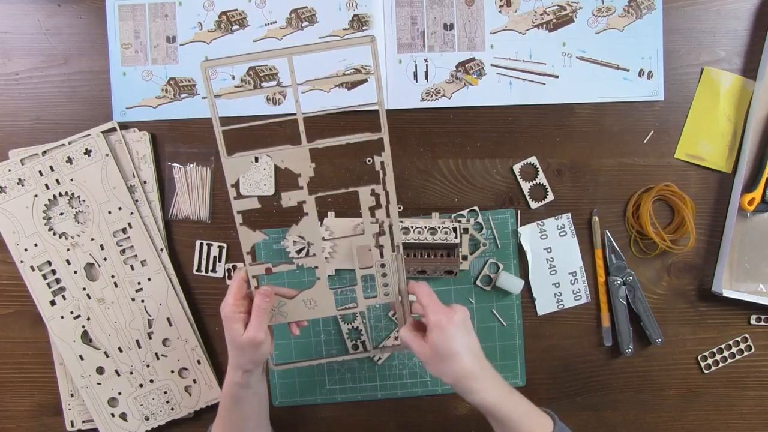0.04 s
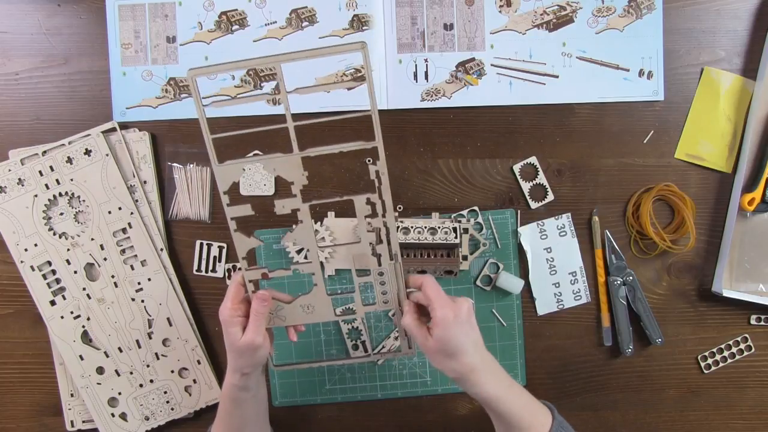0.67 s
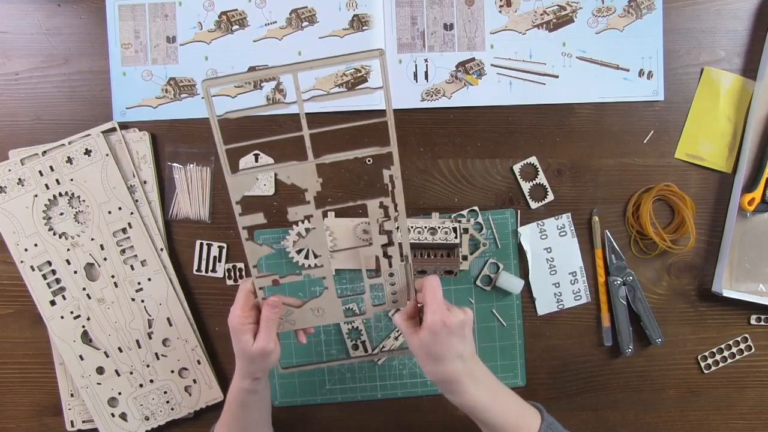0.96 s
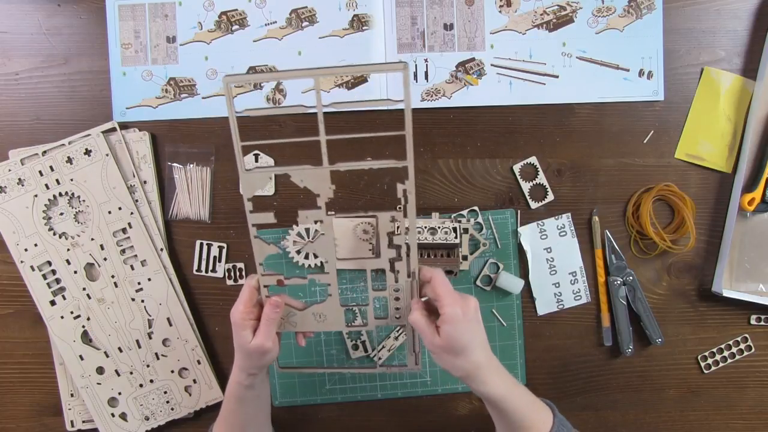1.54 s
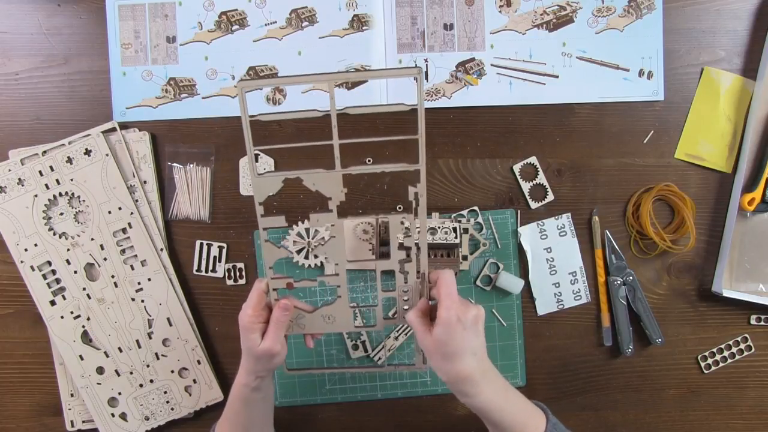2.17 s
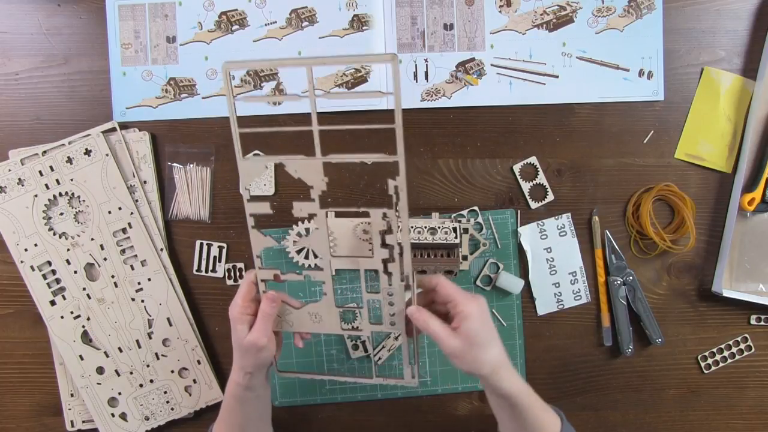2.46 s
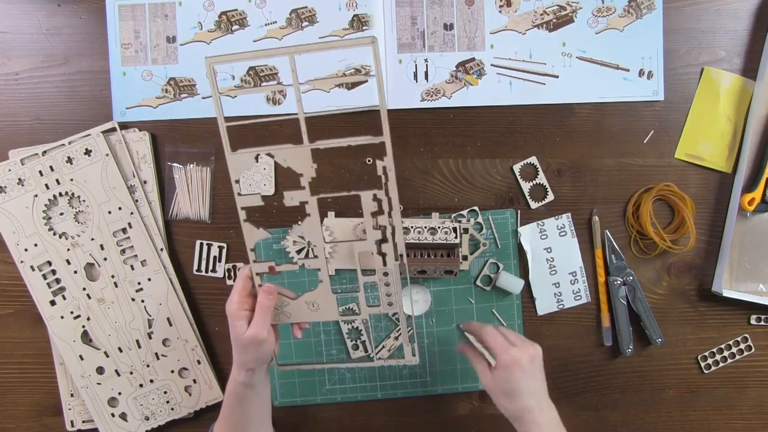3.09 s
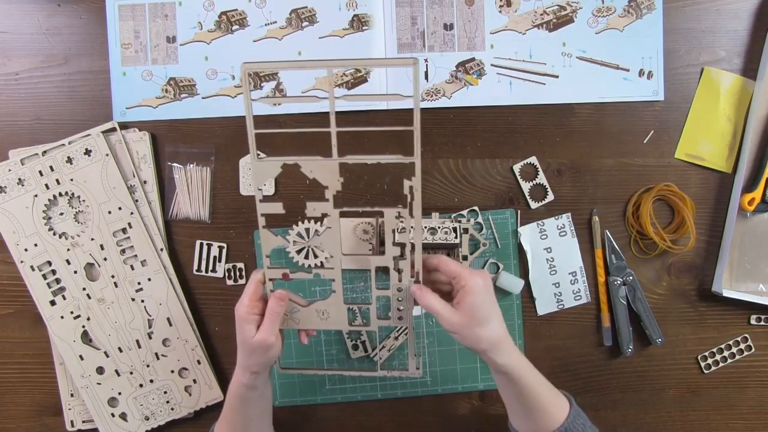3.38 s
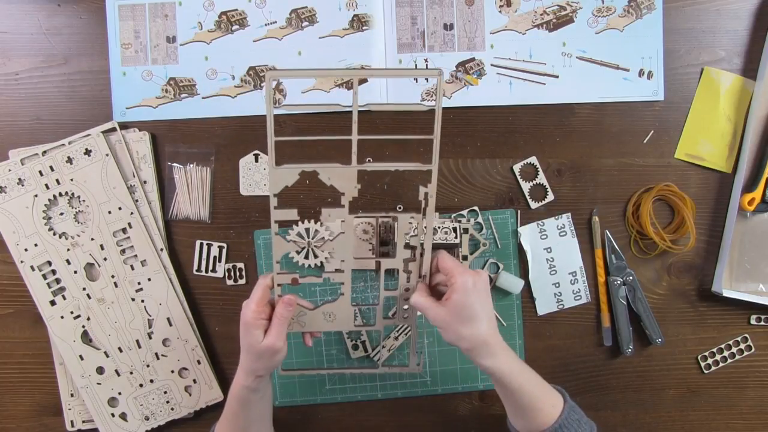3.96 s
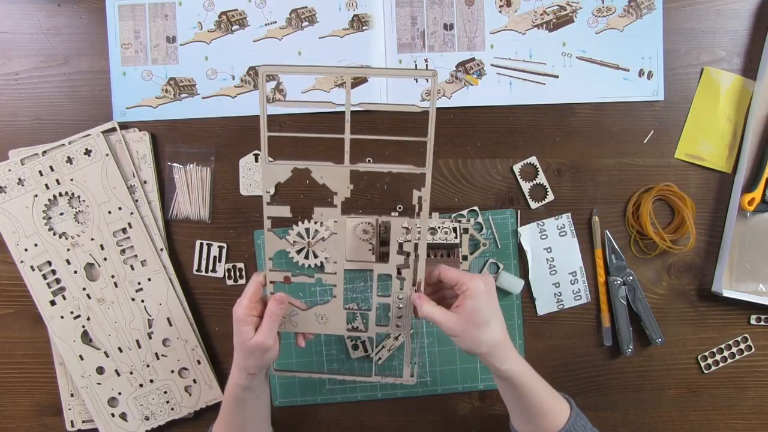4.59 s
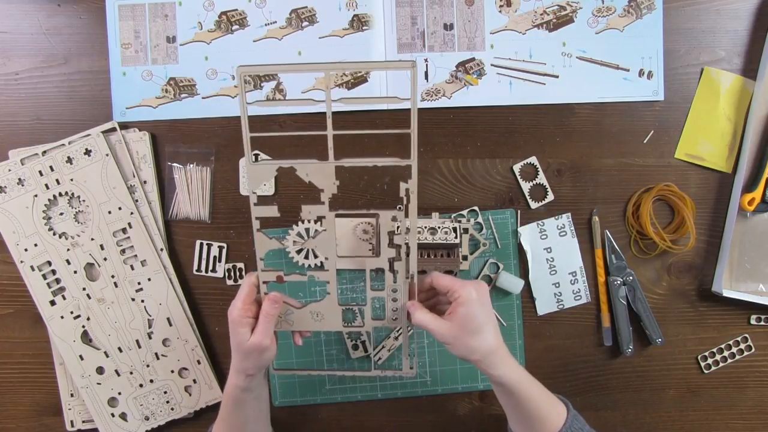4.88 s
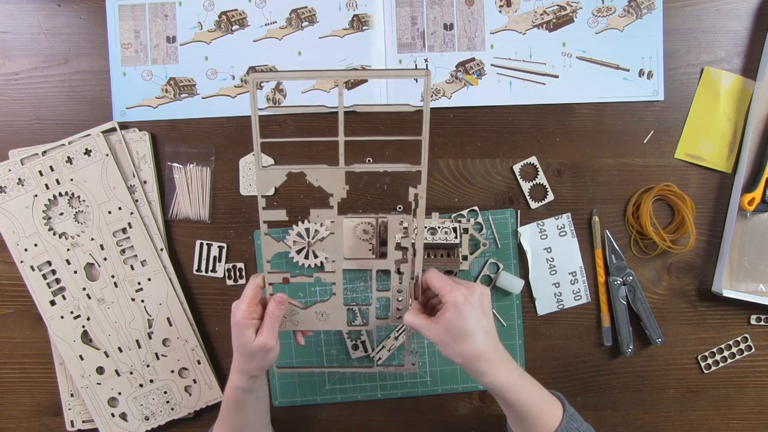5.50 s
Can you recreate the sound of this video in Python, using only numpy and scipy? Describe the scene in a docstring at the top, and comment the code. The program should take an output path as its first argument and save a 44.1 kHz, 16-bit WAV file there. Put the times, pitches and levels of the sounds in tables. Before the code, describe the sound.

Fingers press small parts out of a thin plywood sheet, making irregular sharp snaps and tiny cracks, with faint rubbing and a brief squeak between them. Three louder snaps come close together, then a freed wooden disc drops and bounces on the table with a dry, ringing clack. A few softer clicks follow. It is heard close up in a small room with a low rumble.

```python
"""Pressing parts out of plywood

Small parts are pushed by hand out of a thin laser-cut sheet, close up in a small room with a low rumble.
Fingers slide and squeak on the wood. Fibres crack as a tab bends, the tab snaps and its broken end
catches once more, each break ringing the sheet. A freed wooden disc drops and bounces on the table."""
import sys
import numpy as np
from scipy import signal
from scipy.fft import rfft, irfft
from scipy.io import wavfile

SR = 44100
rng = np.random.default_rng(int(sys.argv[2]) if len(sys.argv) > 2 else 0)


def store_wav(level_fs):
    """Save 16-bit WAV to argv[1]."""
    pcm = np.round(np.clip(np.atleast_2d(level_fs), -1, 1) * 32767)
    wavfile.write(sys.argv[1], SR, pcm.T.astype(np.int16))


N = 248546
TIME = np.arange(N) / SR
CUTOFF_HZ = 16000

# The colour of the room tone. Each row: frequency in Hz, relative level in dB.
ROOM_TONE = [(15, -56), (25, -10), (36, -16.5), (64, 1.5), (157, -4), (194, -5.5), (352, -11), (486, -12.5),
             (527, -13.5), (729, -16), (857, -17), (1060, -20), (2150, -23.5), (2970, -25.5), (15800, -34)]
# The room's answer. Each row: frequency in Hz, early reflections in dB, tail in dB, tail t60 in seconds.
ROOM_REVERB = [(125, -33, -19, 1), (496, -9.5, -18, 0.26), (1480, -10.5, -18, 0.41),
               (3950, -20.5, -20, 0.79), (8000, -21, -24.5, 0.3), (14000, -14, -20, 0.54)]
# Fingers and loose parts sliding on the sheet. Each row: midpoint in seconds, length in seconds,
# level in dB, tilt in dB per octave, pitch of the touched strip in Hz.
STROKES = [(0.078, 0.11, -59.5, -2.5, 11600), (0.362, .11, -58.5, -0.5, 8700),
           (0.508, .19, -54.5, 1.2, 7600), (0.671, 0.15, -59, 0.5, 14800), (1.154, 0.12, -56.5, -4.5, 5570),
           (1.237, 0.049, -50.5, 0.5, 14400), (1.291, .1, -59, -0.5, 6000), (1.395, 0.15, -54, 3, 5280),
           (1.544, 0.3, -59.5, 0.5, 14800), (1.851, 0.099, -65, 11, 10100), (2.0, 0.056, -57.5, 2, 11800),
           (2.509, 0.095, -54.5, -1, 7100), (2.593, .08, -42.5, 2, 6200), (2.662, 0.084, -50, -1, 5000),
           (2.912, 0.22, -60, -2.5, 6500), (3.483, 0.11, -67, 5, 12860), (3.595, 0.032, -59.5, 0, 9300),
           (3.904, .11, -56.5, 2, 2700), (4.33, 0.31, -61.5, -1, 11900), (4.821, 0.13, -52, 1, 14800),
           (5.511, 0.21, -60.5, -0.5, 6400)]
# Stick-slip squeaks. Each row: start in seconds, length in seconds, slips per second, level in dB.
SQUEAKS = [(0.579, .003, 790, -44), (1.247, .015, 616, -37.5), (1.262, .013, 650, -41),
           (1.28, .006, 205, -35.5)]
# The body of a squeak. Each row: pitch in Hz, level in dB, t60 in seconds.
SQUEAK_MODES = [(720, -15, 0.025), (900, -1, 0.0068), (1870, -7, 0.0031)]
# A loose part knocking in its slot. Each row: start in seconds, pitch in Hz, level in dB.
SLOT_KNOCKS = [(2.2756, 926, -13), (2.3495, 646, -7.5)]
# The four registers of a hit: thump, knock, crack and edge. Each row: bottom in Hz, top in Hz.
REGISTERS = [(75, 440), (450, 1500), (1600, 6400), (7000, 16500)]
# The disc landing and bouncing. Each row: start in seconds, contact time in seconds, level in dB.
BOUNCES = [(3.0794, 0.002, -7.5), (3.0825, 0.00126, 1), (3.136, 0.00067, -20), (3.1533, 0.0019, -9),
           (3.183, .0013, -44)]
# The ring of the disc and the table under it. Each row: pitch in Hz, level in dB, t60 in seconds.
DISC_MODES = [(440.5, -9.5, 0.33), (963, -12, .12), (1256, -11.5, 0.11), (1385, -9, 0.03),
              (1674, -4.5, 0.05), (2205, -10, .06), (2500, -12, 0.086), (3110, -5.5, .05),
              (3615, -12, 0.026), (4770, -21, .055), (5500, -3.5, 0.014), (6050, -7.5, 0.015),
              (7850, -8.5, 0.011), (11100, -4, .009)]
# The ring of the held sheet. Each row: pitch in Hz, level in dB, t60 in seconds.
SHEET_MODES = [(293, -15, 0.051), (495, -21, 0.56), (654, -18, 0.05), (806, -4, 0.017), (2198, -12, 0.022),
               (2636, -12, 0.026), (3050, -16, 0.036), (3620, -12, 0.06), (5390, -24, 0.11),
               (11300, -25, .045)]
# The strip of wood being worked on. Each row: start in seconds, pitch of its ping in Hz.
STRIP_PITCHES = [(0, 12380), (0.15, 6070), (0.23, 9000), (0.8, 5630), (0.9, 2440), (0.96, 5580),
                 (1.3, 2460), (2.0, 3780), (2.2, 9800), (2.3, 12260), (3.7, 14200), (5.3, 6500)]
# Fibres cracking while the tab still holds. Each row: start in seconds, length in seconds,
# level in dB, edge in dB relative to that level.
FIBRE_CRACKS = [(0.0472, 0.0011, -27.5, 11), (0.2516, .0011, -29, 3), (0.26, 0.0015, -25, 7.5),
                (0.8714, 0.00041, -20, -3), (0.9329, 0.00091, -16.5, -12), (0.9406, 0.001, -15, -11),
                (0.9433, 0.0012, -12, -1.5), (0.9476, 0.0029, -18, -3), (0.955, 0.00069, -17.5, -5),
                (1.0268, 0.00058, -20, 4), (1.14, 0.0013, -30.5, 12), (1.169, 0.0025, -18, 5),
                (1.187, 0.0033, -25, 2), (1.341, 0.002, -27.5, 3.5), (1.35, 0.0018, -27, -6),
                (1.805, 0.0016, -31.5, 5), (2.2483, 0.0023, -28.5, 9.5), (2.273, 0.0028, -14.5, 1),
                (2.3395, 0.0085, -18.5, 6), (2.443, 0.0025, -28, 4.5), (2.5905, 0.0022, -17, -1.5),
                (3.7684, 0.0023, -20.5, 4.5), (3.8014, 0.0022, -21.5, -11), (3.8209, 0.0017, -16, -4),
                (3.937, 0.0012, -34, 6), (5.081, 0.0014, -32.5, 11), (5.537, .0017, -28, -3)]
# Tabs snapping through. Each row: start in seconds, length in seconds, level in dB,
# then thump, knock, edge and recoil in dB relative to that level.
TAB_SNAPS = [(0.1995, 0.0016, -5.5, 0.5, -6.5, -1.5, -23), (0.9651, 0.00092, -17, 4.5, -0.5, 7.5, 2.5),
             (2.071, 0.0015, -4, -2, -5, -2, -17.5), (2.2562, 0.0036, -6, -13, -13.5, 1, -10.5),
             (2.3491, 0.0015, 0.5, -16, -18, -9, -15.5), (3.8803, 0.0019, -18.5, 0, -9, 4, -25)]


def from_db(db):
    """Decibels to gain."""
    return 10 ** (np.asarray(db) / 20)


def unit_energy(x):
    """Scale so that the squares sum to one."""
    return x / np.sqrt(np.sum(x ** 2) + 1e-20)


def at_hz(points, hz, column=1):
    """Read a column of a table along log frequency."""
    points = np.array(points)
    return np.interp(np.log(hz), np.log(points[:, 0]), points[:, column])


def add(out, start, sound):
    """Mix a sound in at a start time in seconds."""
    first = max(0, round(start * SR))
    out[first:first + len(sound)] += sound[:N - first]


def bandpass(x, edges_hz, order=2):
    """Keep the band between two frequencies."""
    return signal.sosfilt(signal.butter(order, edges_hz, "band", fs=SR, output="sos"), x)


def ring(force, hz, t60):
    """One damped mode; a unit click rings with height one."""
    radius, angle = from_db(-60 / (t60 * SR)), 2 * np.pi * hz / SR
    return signal.lfilter([0, np.sin(angle)], [1, -2 * radius * np.cos(angle), radius ** 2], force + 1e-18)


def room_tone(level_db=-56):
    """The bed: a steady low rumble with a faint hiss on top."""
    hz = np.maximum(np.fft.rfftfreq(N, 1 / SR), 1)
    rumble = irfft(rfft(rng.standard_normal(N)) * from_db(at_hz(ROOM_TONE, hz)), N)
    return from_db(level_db) * unit_energy(rumble) * np.sqrt(N)


def room_reverb(x, first_s=0.0038, build_s=0.011, early_t60=0.07):
    """Quick reflections off the table and the things on it, then a soft tail."""
    t, response = TIME[:SR * 2 // 3], 0
    fade_in = np.clip(t / first_s - 1, 0, 1)
    edges_hz = np.geomspace(22, 17000, 25)
    for low, high in zip(edges_hz, edges_hz[1:]):
        hz = np.sqrt(low * high)
        early_db, tail_db, tail_t60 = (at_hz(ROOM_REVERB, hz, column) for column in (1, 2, 3))
        early, tail = bandpass(rng.standard_normal((2, len(t))), [low, high]) * fade_in
        early = unit_energy(early * from_db(-60 * t / early_t60))
        tail = unit_energy(tail * (1 - np.exp(-t / build_s)) * from_db(-60 * t / tail_t60))
        share = np.sqrt(2 * hz * np.log(high / low) / SR)   # the band's part of the whole spectrum
        response += share * (from_db(early_db) * early + from_db(tail_db) * tail)
    return signal.fftconvolve(x, response)[:N]


def strain_ticks(per_s=80, level_db=-67.5, decay_s=0.002, low_hz=1800, strain_s=0.32):
    """Stray fibres tick in the bent sheet, louder around each break, where the strain peaks."""
    clicks = (rng.random(N) < per_s / SR) * rng.uniform(0.4, 1, N)
    envelope = signal.lfilter([1], [1, -np.exp(-1 / (decay_s * SR))], clicks + 1e-18)
    low_cut = signal.butter(1, low_hz, "high", fs=SR, output="sos")
    ticks = signal.sosfilt(low_cut, envelope * rng.standard_normal(N))
    to_break = np.min([np.abs(TIME - row[0]) for row in TAB_SNAPS + FIBRE_CRACKS], axis=0)
    return from_db(level_db) * np.exp(-to_break / strain_s) * unit_energy(ticks) * np.sqrt(N)


def rubbing(grain_db=4.0, catch_db=3.5, catches_per_s=150, strips_db=-4.5, note_db=-9.5, low_hz=1300):
    """Skin drags over the grain: dense ticks that waver as it catches and set the strips singing."""
    out = np.zeros(N)
    for middle, length, level_db, tilt, note_hz in STROKES:
        t = TIME[:round(length * SR)]
        ticks = rng.standard_normal(len(t)) * from_db(grain_db * rng.standard_normal(len(t)))
        strips = sum(unit_energy(ring(ticks, hz, t60=0.011)) for hz in rng.uniform(2200, 15500, 12))
        scrape = unit_energy(ticks) + from_db(strips_db) * unit_energy(strips)
        hz = np.maximum(np.fft.rfftfreq(len(t), 1 / SR), 1)
        colour = from_db(tilt * np.log2(hz)) * hz / np.hypot(hz, low_hz) * (hz < CUTOFF_HZ)
        scrape = unit_energy(irfft(rfft(scrape) * colour, len(t)))
        # the finger damps the strip right under it to two dozen cycles
        scrape += from_db(note_db) * unit_energy(ring(ticks, note_hz, 24 / note_hz))
        catching = np.interp(t * catches_per_s, np.arange(len(t)), rng.standard_normal(len(t)))
        swell = from_db(level_db + catch_db * catching) * np.sin(np.linspace(0, np.pi, len(t)))
        add(out, middle - length / 2, swell * scrape * np.sqrt(len(t)))
    return out


def squeaks(jitter=0.2, uneven_db=2.5):
    """A fingertip or a tight part sticks and slips in short runs, driving the sheet's low modes."""
    slips = np.zeros(N)
    for start, length, per_s, level_db in SQUEAKS:
        offsets = np.cumsum(np.abs(1 + jitter * rng.standard_normal(24))) / per_s
        offsets -= offsets[0]
        for offset in offsets[offsets < length]:
            add(slips, start + offset, from_db([level_db + uneven_db * rng.standard_normal()]))
    return sum(from_db(db) * ring(slips, hz, t60) for hz, db, t60 in SQUEAK_MODES)


def fibre_burst(t, length, rise_s=0.00009, stretch=1.44, uneven_db=3.0):
    """The attack of a hit: an avalanche of tiny, uneven ruptures that dies within milliseconds."""
    envelope = (1 - np.exp(-t / rise_s)) * np.exp(-t / (stretch * length))
    return envelope * rng.standard_normal(len(t)) * from_db(uneven_db * rng.standard_normal(len(t)))


def wood_hits(hits, modes, attack_db, ring_db, scatter_db, detune, colour_share):
    """Each hit is a burst, coloured in four registers, that also sets the wood's modes ringing."""
    out, t = np.zeros(N), TIME[:SR // 4]
    centres_hz = np.sqrt(np.prod(REGISTERS, axis=1))
    for start, length, level_db, thump_db, knock_db, edge_db, *_ in hits:
        colour = [thump_db, knock_db, 0, edge_db]
        for edges_hz, register_db in zip(REGISTERS, colour):
            attack = bandpass(fibre_burst(t[:SR // 20], length) + 1e-18, edges_hz)
            add(out, start, from_db(level_db + register_db + attack_db) * unit_energy(attack))
        force = fibre_burst(t, length)
        for hz, mode_db, t60 in modes:
            # grip and contact shift the modes from hit to hit
            level_shift, pitch_shift = np.clip(rng.standard_normal(2), -2, 2)
            drive_db = level_db + colour_share * at_hz(list(zip(centres_hz, colour)), hz)
            gain = from_db(drive_db + mode_db + ring_db + scatter_db * level_shift)
            add(out, start, gain * unit_energy(ring(force, hz * (1 + detune * pitch_shift), t60)))
    return out


def slot_knocks(contact_s=0.00023, ring_cycles=26):
    """A loosened part hits the side of its slot with a short, hollow note."""
    out, t = np.zeros(N), TIME[:SR // 10]
    for start, hz, level_db in SLOT_KNOCKS:
        note = ring(fibre_burst(t, contact_s), hz, ring_cycles / hz)
        add(out, start, from_db(level_db) * unit_energy(note))
    return out


def table_clack(gain_db=-5.5, t60=0.071, band_hz=(900, 4800)):
    """Under each bounce, the table's countless close modes blur into a dry clack."""
    out, t = np.zeros(N), TIME[:SR // 4]
    for start, _, level_db in BOUNCES:
        clack = bandpass(rng.standard_normal(len(t)) * from_db(-60 * t / t60), band_hz, order=3)
        add(out, start, from_db(level_db + gain_db) * unit_energy(clack))
    return out


def disc_drop(thump_db=-21, knock_db=-14.5, edge_db=-9.5, dulling=0.8):
    """The freed disc lands, bounces and rings; the weaker the contact, the duller it sounds."""
    hits = [(start, length, db, thump_db - dulling * db, knock_db - dulling * db, edge_db)
            for start, length, db in BOUNCES]
    return wood_hits(hits, DISC_MODES, attack_db=1.0, ring_db=-2.0, scatter_db=5.0,
                     detune=0.0016, colour_share=0.57)


def strip_pings(hits, t60_at_3khz=0.011, falloff=0.3):
    """The strip that a break lets go springs back at its own pitch; higher pings die sooner."""
    out, t = np.zeros(N), TIME[:SR // 10]
    for start, length, level_db, *_, ping_db in hits:
        hz = [pitch for since, pitch in STRIP_PITCHES if since <= start][-1]
        ping = ring(fibre_burst(t, length / 2), hz, t60_at_3khz * (3000 / hz) ** falloff)
        add(out, start, from_db(level_db + ping_db) * unit_energy(ping))
    return out


def crack_hit(start, length, level_db, edge_db, ping_db=-1.0):
    """The hit for one small break: the sharper its edge, the harder it jolts the sheet."""
    thump_db = -15.0 + 1.53 * edge_db
    knock_db = -8.5 + 0.36 * edge_db
    return start, length, level_db, thump_db, knock_db, edge_db, ping_db


def breaking_tabs(snap_ping_db=-0.5, recoil_delay_s=0.008, recoil_length_s=0.0012):
    """Fibres crack, tabs snap and each broken end springs back and catches; sheet and strip ring."""
    hits = [crack_hit(*row) for row in FIBRE_CRACKS]
    for start, length, level_db, *colour, recoil_db in TAB_SNAPS:
        hits.append((start, length, level_db, *colour, snap_ping_db))
        hits.append(crack_hit(start + recoil_delay_s, recoil_length_s, level_db + recoil_db, edge_db=5.5))
    sheet = wood_hits(hits, SHEET_MODES, attack_db=0.5, ring_db=0.0, scatter_db=0.3,
                      detune=0.0346, colour_share=0.74)
    return sheet + strip_pings(hits)


def scene():
    """The mono mix: the handled sheet and the falling disc in the room, over its rumble."""
    wood = breaking_tabs() + disc_drop() + table_clack() + slot_knocks()
    wood += squeaks() + rubbing() + strain_ticks()
    return (room_tone() + wood + room_reverb(wood))[None]


def record(dry):
    """A steep low-pass takes off the very top."""
    return signal.sosfilt(signal.ellip(10, 0.2, 70, CUTOFF_HZ, fs=SR, output="sos"), dry)


dry = scene()
out = record(dry)
store_wav(out)
```